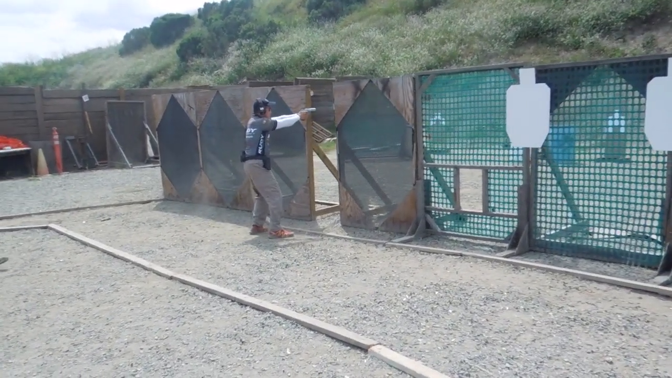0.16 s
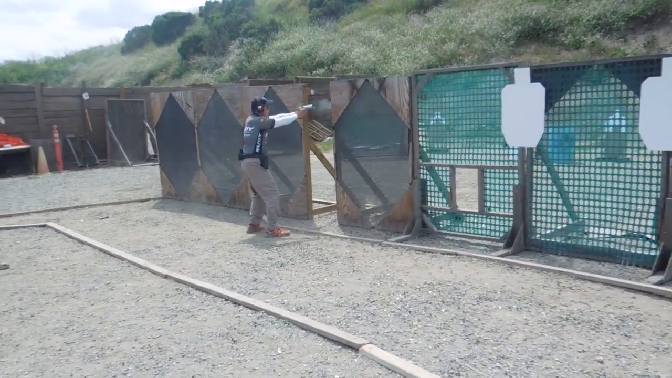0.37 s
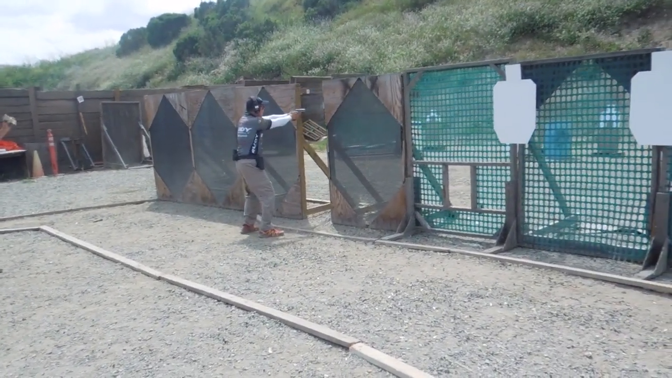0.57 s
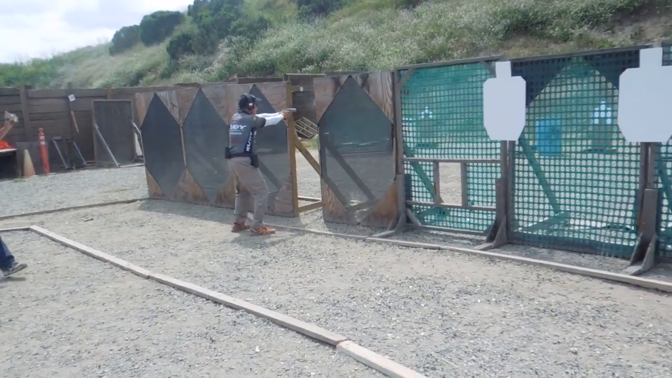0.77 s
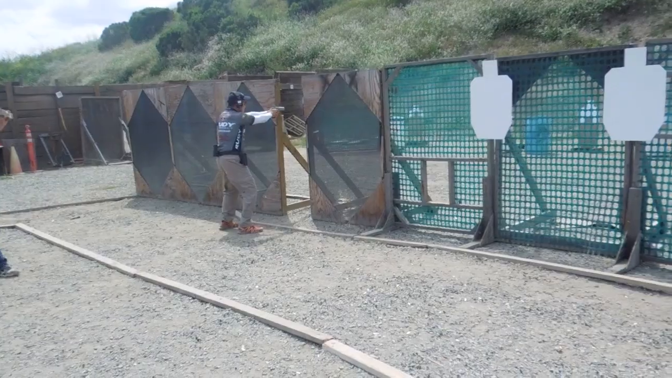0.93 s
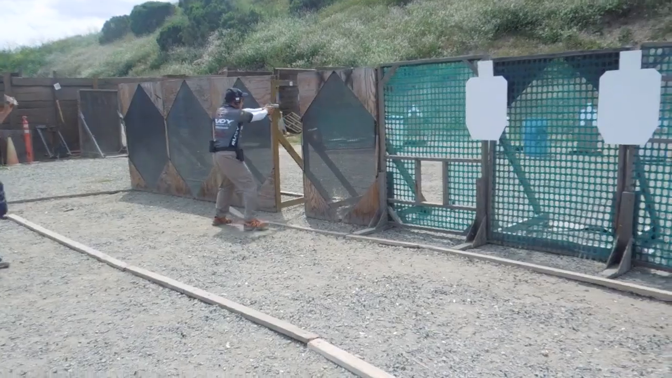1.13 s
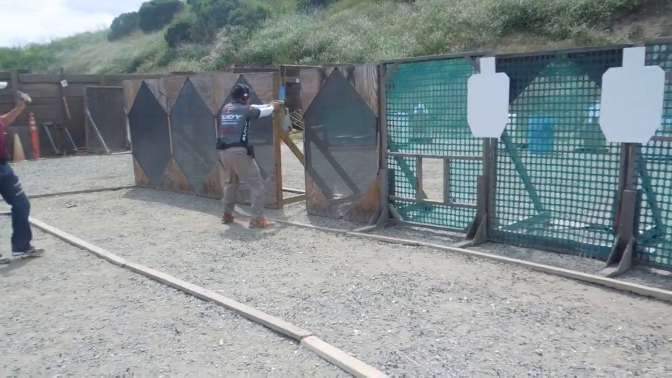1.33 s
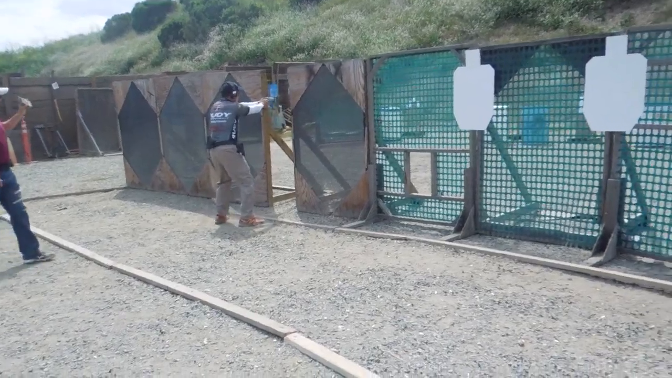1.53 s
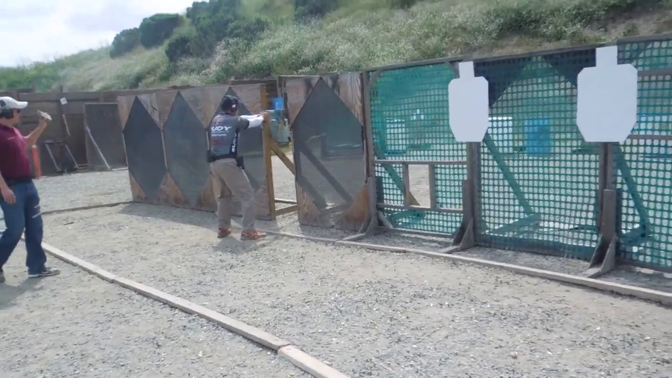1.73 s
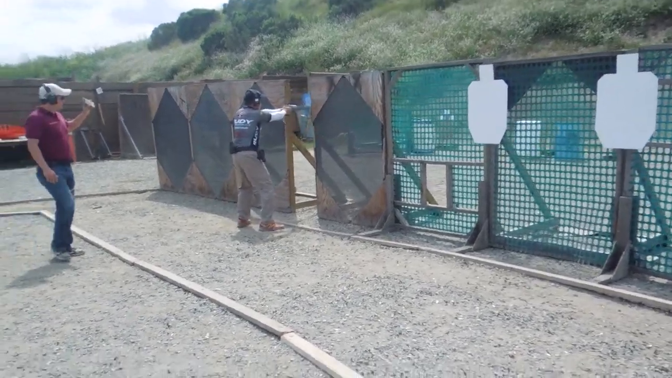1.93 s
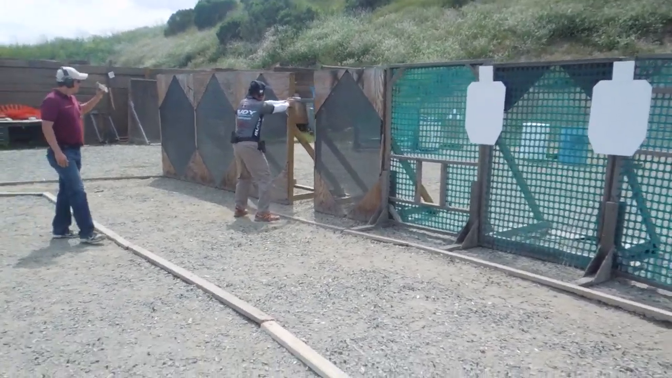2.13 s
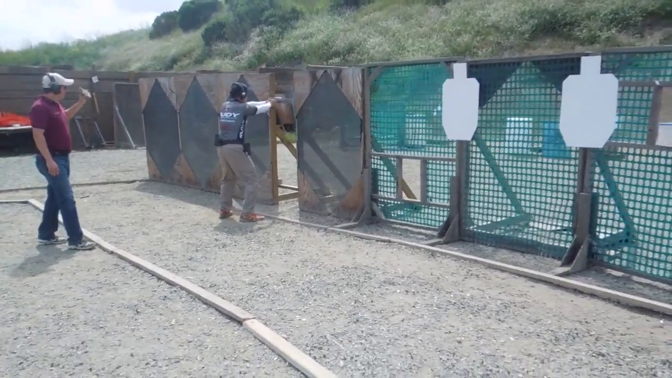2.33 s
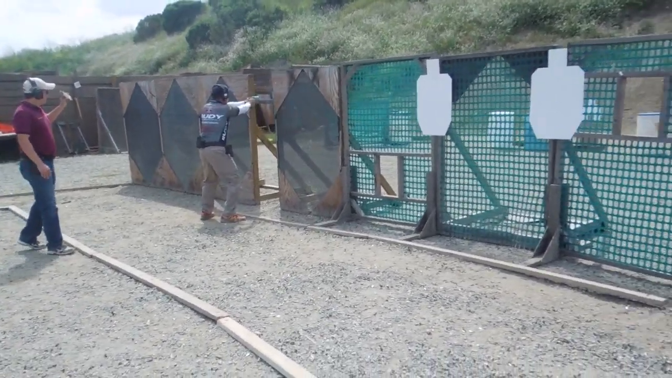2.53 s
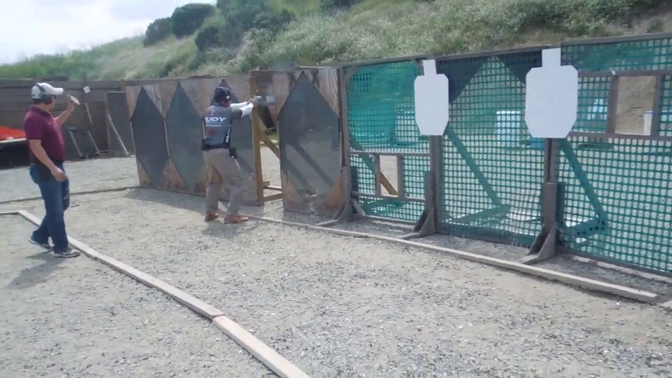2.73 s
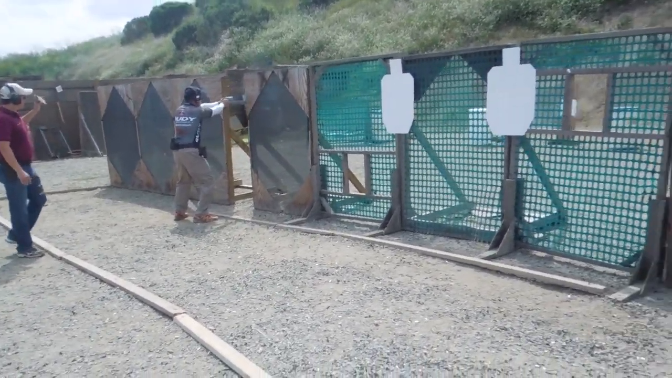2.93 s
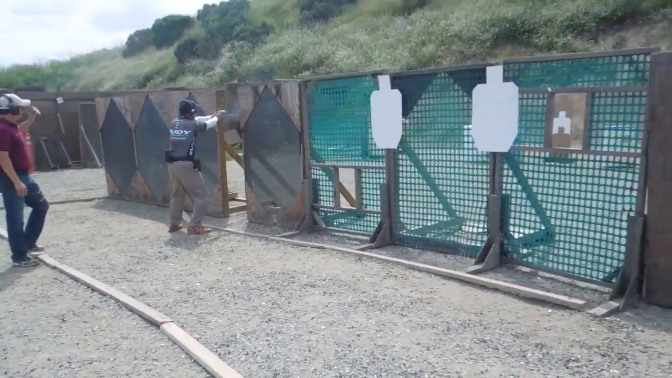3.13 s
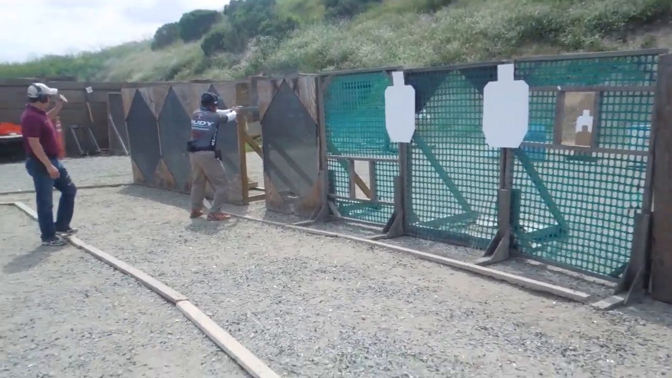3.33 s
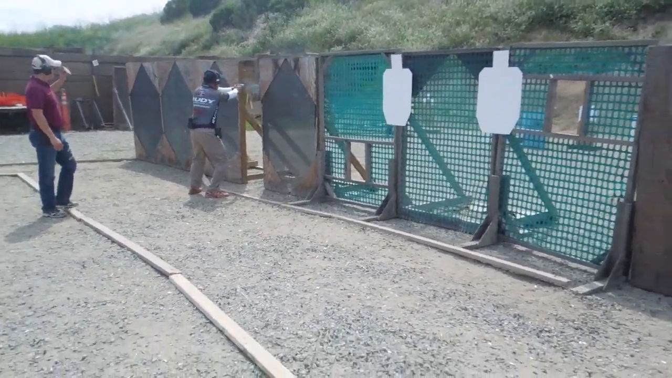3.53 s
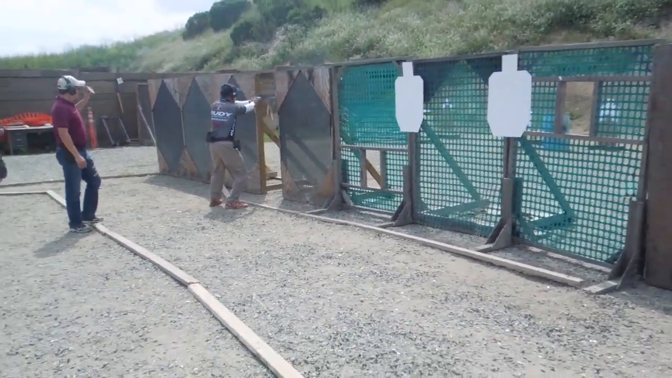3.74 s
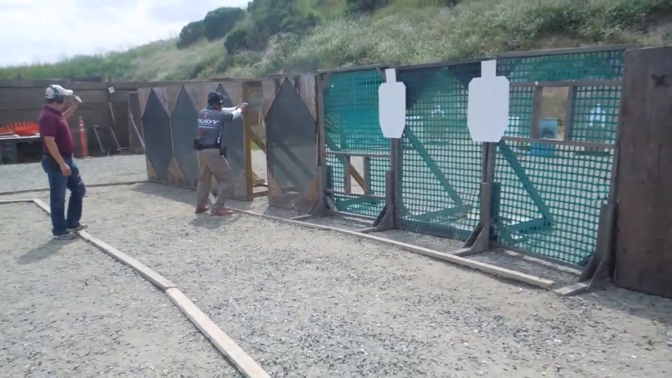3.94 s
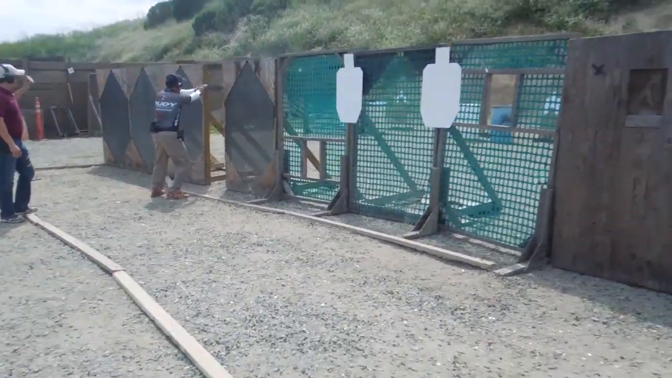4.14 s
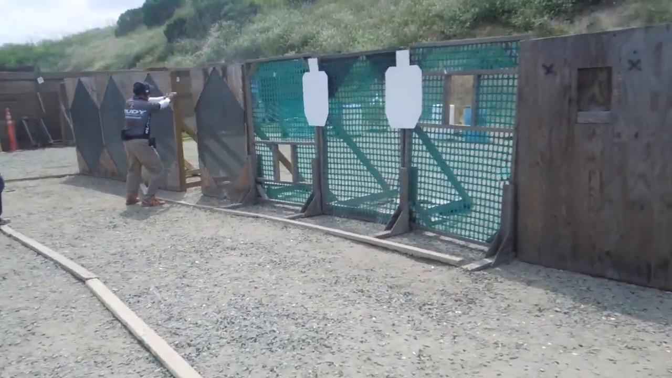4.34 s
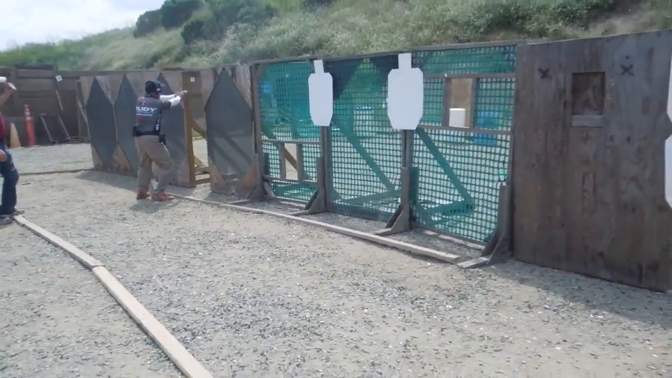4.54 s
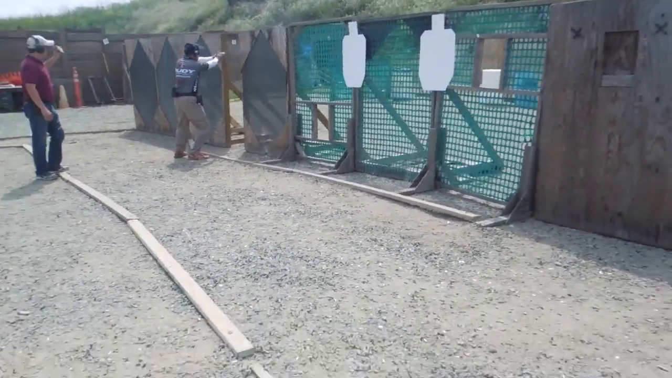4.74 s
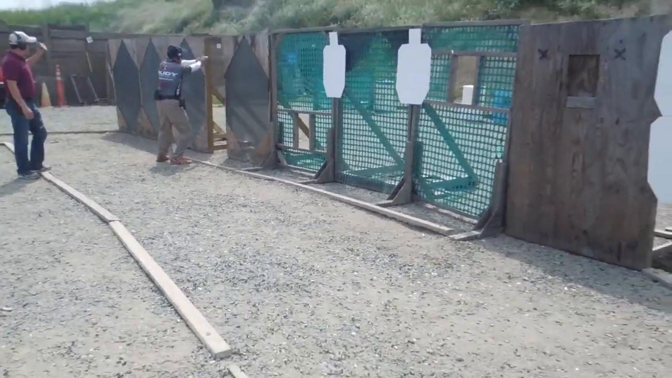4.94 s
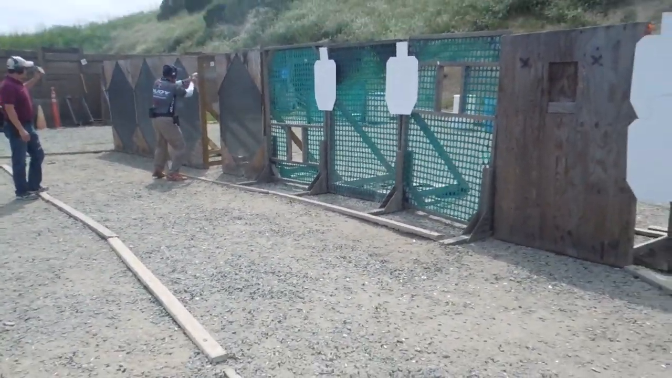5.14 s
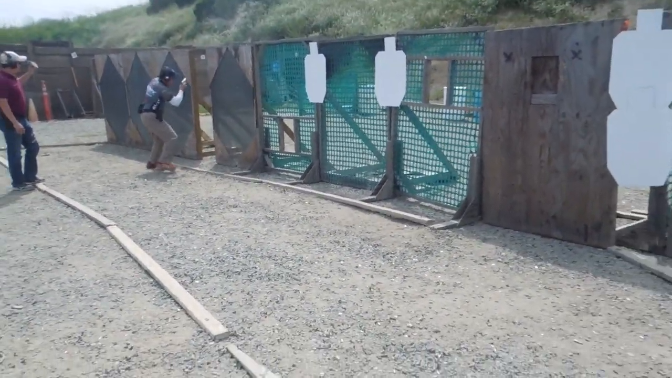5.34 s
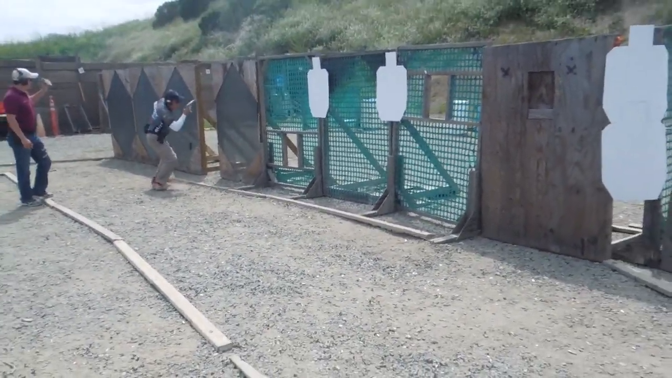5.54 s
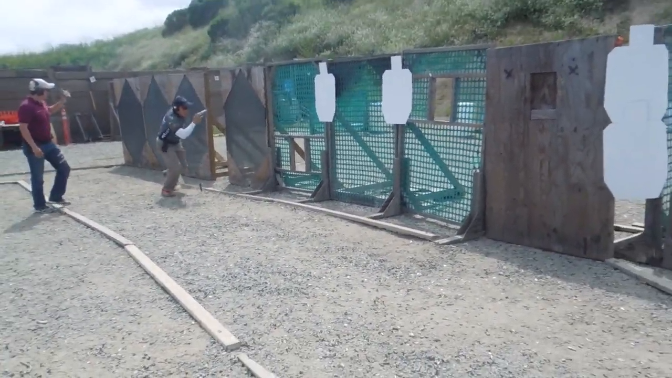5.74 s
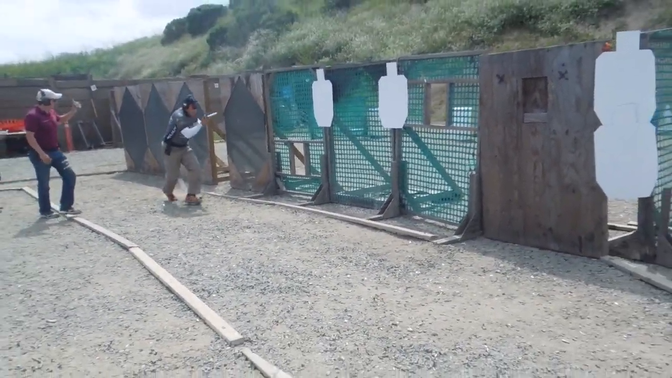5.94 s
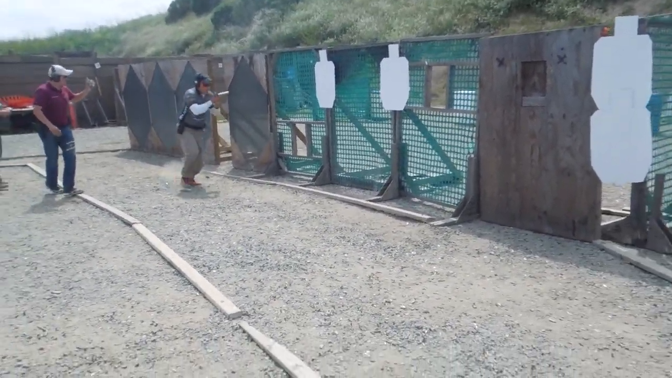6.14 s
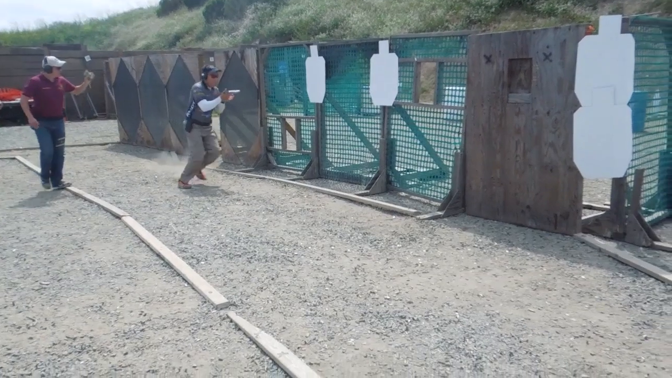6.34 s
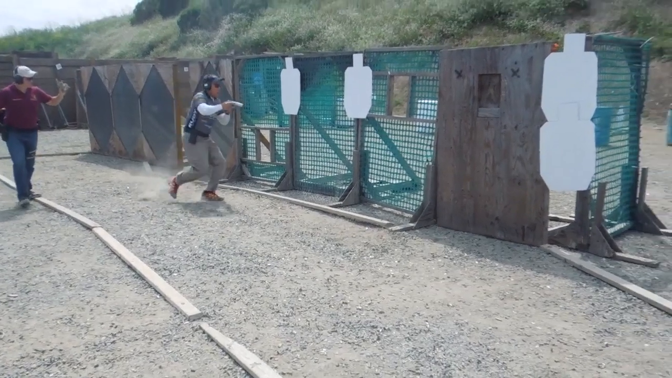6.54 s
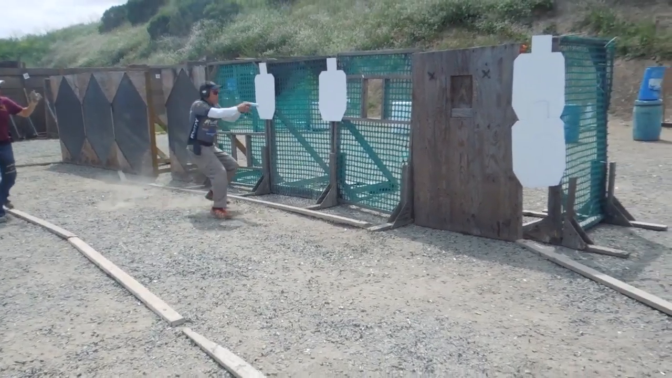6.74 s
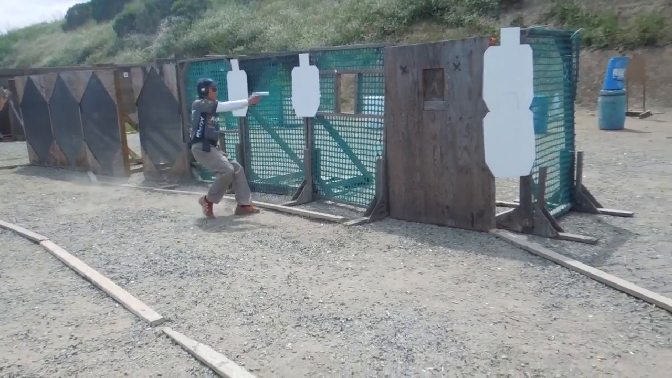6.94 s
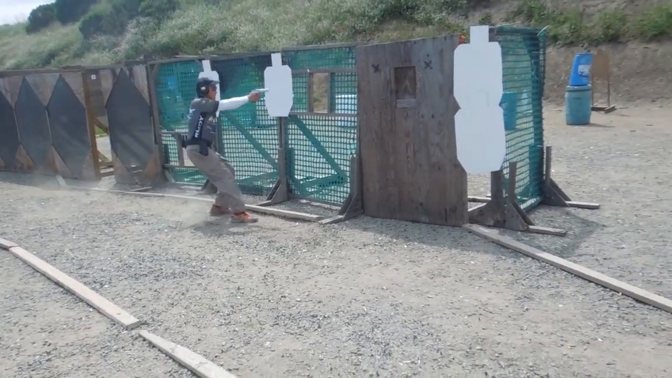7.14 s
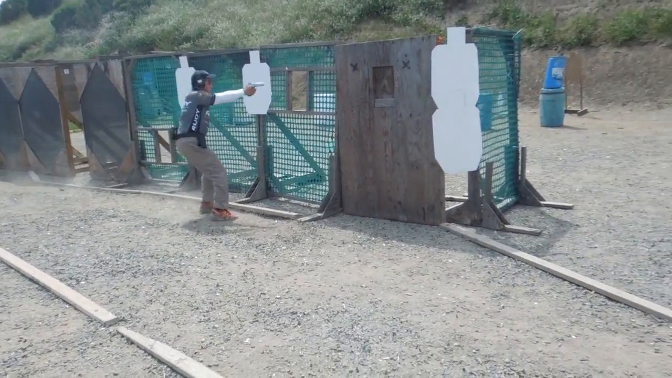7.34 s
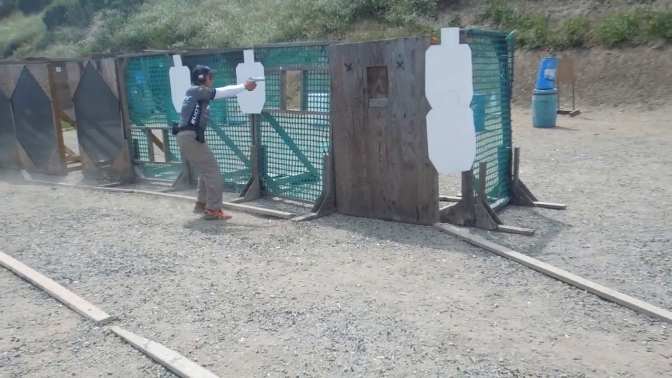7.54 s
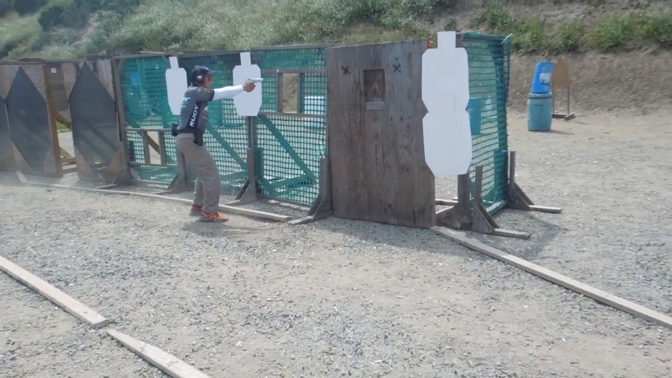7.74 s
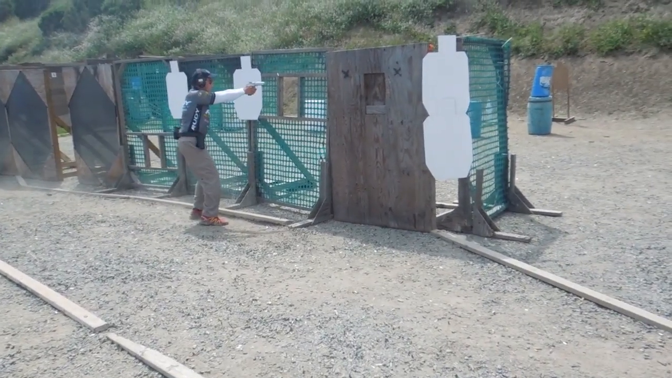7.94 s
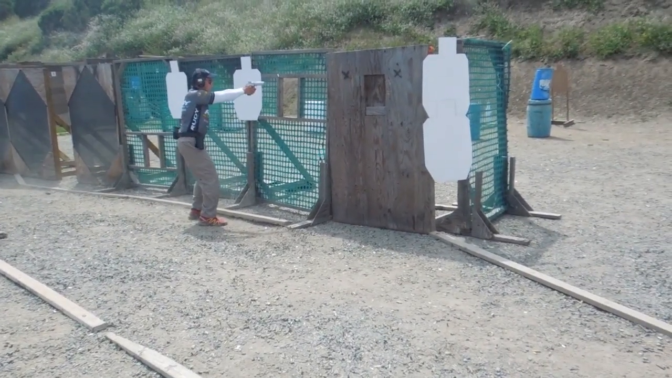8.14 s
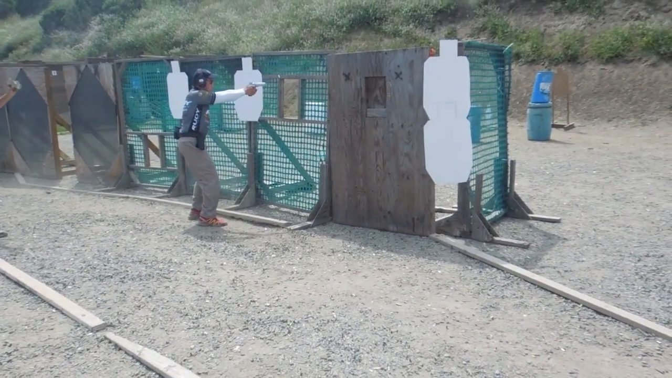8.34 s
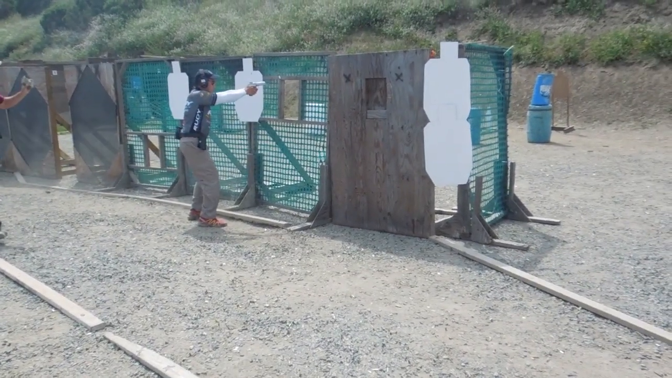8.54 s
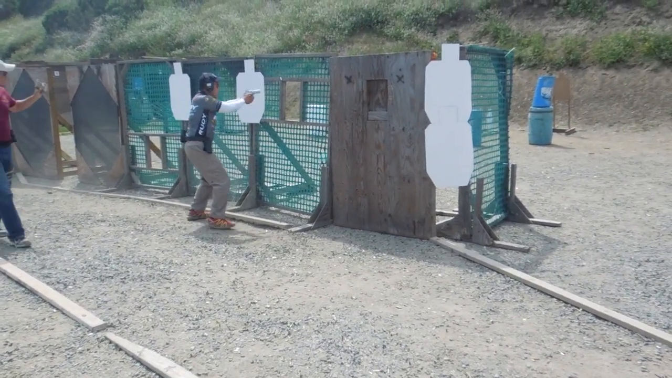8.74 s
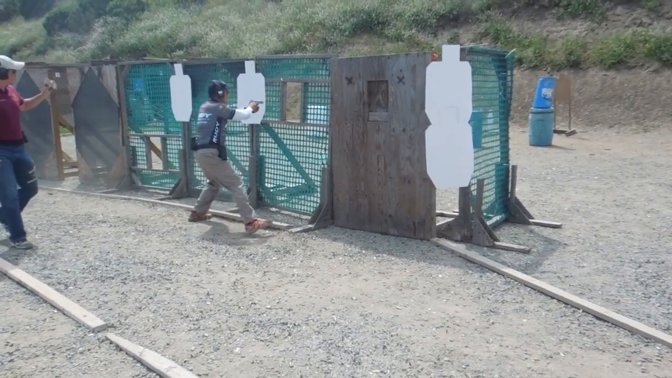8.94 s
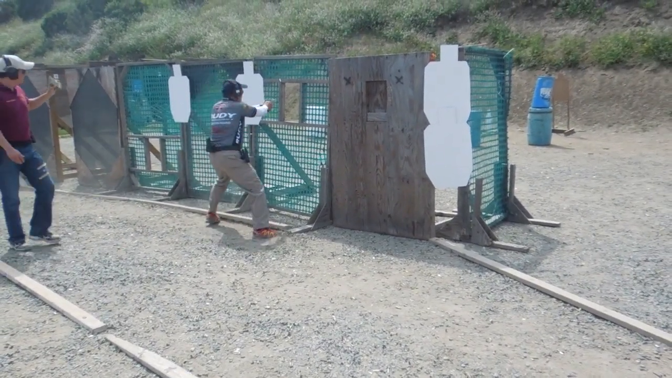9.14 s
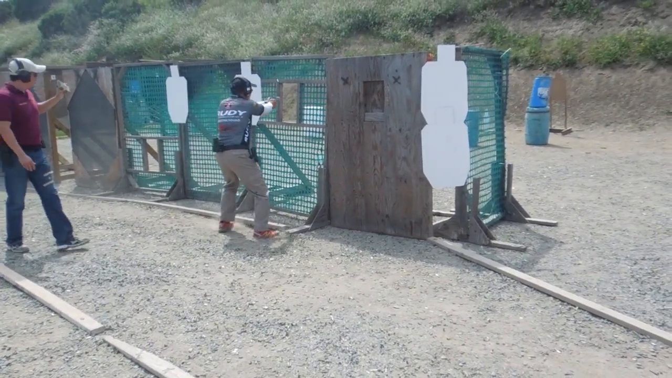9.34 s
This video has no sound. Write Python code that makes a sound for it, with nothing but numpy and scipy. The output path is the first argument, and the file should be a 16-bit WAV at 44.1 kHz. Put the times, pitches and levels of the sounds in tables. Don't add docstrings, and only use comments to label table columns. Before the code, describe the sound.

Loud, clipped pistol shots crack and slap back off walls outdoors, then boots crunch gravel and brass cases tinkle before two more shots.

```python
import sys
import numpy as np
from scipy import signal
from scipy.fft import rfft, irfft, next_fast_len
from scipy.io import wavfile
from scipy.ndimage import uniform_filter1d, map_coordinates

SR = 44100
rng = np.random.default_rng(int(sys.argv[2]) if len(sys.argv) > 2 else 0)


def waveform_to_disk(signal):
    frames = np.transpose(np.atleast_2d(signal))
    scaled = np.clip(frames, -1, 1) * 32767
    samples = np.round(scaled).astype(np.int16)
    wavfile.write(sys.argv[1], SR, samples)


def boost(x):
    u = np.asarray(x, float) / 20
    return 10 ** u


N = 414099


def along(points, hz):
    f, v = np.transpose(points)
    return np.interp(np.log(hz + 1), np.log(f + 1), v)


def unit(x):
    return x / np.sqrt(np.mean(x ** 2) + 1e-20)


def wobble(rate, size=N):
    coarse = np.arange(0, size + 16, 16)
    knots = rng.standard_normal(int(size * rate / SR) + 4)
    return np.interp(np.arange(size), coarse, map_coordinates(knots, [coarse * rate / SR], order=2))


def strength(rows):
    return boost(np.interp(np.arange(N) / SR, *np.transpose(rows)))


# frequency in Hz, left-right likeness from 0 to 1.
AROUND = [(60, .6), (130, 0.2), (290, .9), (630, 0.98), (1400, 1), (3000, .94), (6500, .5), (14000, .3)]
# frequency in Hz, left-right likeness from 0 to 1.
ONE_SPOT = [(100, .95), (600, .99), (3000, .97), (6500, .82), (14000, .55)]


def stereo(pair, spectrum, alike):
    size = pair.shape[1]
    m = next_fast_len(size + 4096)
    hz = np.fft.rfftfreq(m, 1 / SR)
    turn = np.arccos(np.clip(along(alike, hz), -1, 1)) / 2
    coloured = rfft(pair, m) * boost(along(spectrum, hz)) * [np.cos(turn), np.sin(turn)]
    mid, side = irfft(coloured, m)[:, :size]
    return unit(np.array([mid + side, mid - side]))


def noise(size, spectrum, alike):
    return stereo(rng.standard_normal((2, size)), spectrum, alike)


def pan(left_right_db):
    return boost([[left_right_db / 2], [-left_right_db / 2]])


def add(track, s, sound):
    i = round((s + 1) * SR)
    track[:, i:i + sound.shape[-1]] += sound


def spare_gain_db(spare_db, t):
    slide_s = .19 + .002 * spare_db
    return spare_db * np.clip(1 - t / slide_s, 0, 1)


# start in seconds, blast in dB, tail in dB, spare gain in dB, capsule sag from 0 to 3.
SHOTS = [(-.3, 0, -10.5, 5, .01), (.096, 2, -10, 21, .42), (0.5126, 9, -21, 15, .4),
         (1.9087, 12, -18, 18, .01), (2.3966, 11, -23, 9.5, .42), (2.8462, 5.5, -26, 7.5, .45),
         (3.199, 4.5, -27, 3, .25), (3.6405, 5.5, -27.5, 5, .25), (3.9788, 0.2, -32, 1.5, .2),
         (4.735, 8.5, -27.5, 3, .06), (5.131, 0.5, -32, 3.5, .04), (8.138, 5, -12.5, 24, .01),
         (8.65, 14, -21.5, 14.5, 0.035)]
# pitch of the gap over its mean, sag left over right in dB.
AIM = [(1, 0), (.9, 0), (.78, 0), (.9, 0), (.91, 1), (.78, .5), (.89, 2), (.93, 4), (.93, 2), (1.02, -3),
       (.99, -5), (.9, 0), (.9, 0)]
# frequency in Hz, width in Hz, level in dB.
MUZZLE = [(790, 230, -0.5), (1620, 150, -3.5), (2200, 450, -6), (3100, 390, -6), (5900, 1600, -14.5),
          (11500, 3000, -6.5)]
# frequency in Hz, level in dB per Hz.
TAIL_COLOUR = [(59, -35), (100, -11), (222, -2.5), (399, -3.5), (700, -2), (1770, -8.5), (2270, -5.5),
               (3760, -11), (5040, -13), (7350, -12.5), (9460, -12.5), (10700, -7.5), (13500, -12),
               (15000, -32)]
# frequency in Hz, time to fall 60 dB in seconds.
BAY_T60 = [(60, 1.3), (280, 1.08), (600, 0.56), (1000, 0.54), (1600, 0.8), (3400, 0.83), (4300, 0.7),
           (6000, 0.77), (12000, 0.53)]


def muzzle_colour(modes):
    hz = np.geomspace(50, 16000, 200)
    power = sum(boost(2 * db) / (1 + (2 * (hz - c) / width) ** 2) for c, width, db in modes)
    return np.transpose([hz, 10 * np.log10(power / (1 + (250 / hz) ** 4))])


def bay_tail(t):
    hz, frames, z = signal.stft(noise(SR, TAIL_COLOUR, AROUND), SR, nperseg=256)
    patches = uniform_filter1d(rng.standard_normal(z.shape[1:]), size=5, axis=0)
    patches = uniform_filter1d(patches, size=3, axis=1)
    decay_db = -60 * frames / along(BAY_T60, hz)[:, None]
    tail = signal.istft(z * boost(2.4 * unit(patches) + decay_db), SR, nperseg=256)[1][:, :SR]
    lumps = boost(0.51 * wobble(160, size=SR))
    return tail * lumps * (1 - np.exp(-t / .004))


def capsule_sag(t, spare_db):
    dip = -1.3 * (t / 0.0043) * np.exp(1 - t / 0.0044)
    rebound_s = .182 - .0033 * spare_db
    swing = 0.55 * (1 - np.exp(-t / 0.039)) * np.exp(-t / 0.14)
    swing *= np.cos(np.pi / 2 * (t / rebound_s) ** .62)
    return dip + swing * np.cos(np.pi * t / 2) ** 2


def shots():
    track, t = np.zeros((2, N + 3 * SR)), np.arange(SR) / SR
    near_size = SR // 10
    for (s, blast_db, tail_db, spare_db, sag), (pitch, pan_db) in zip(SHOTS, AIM):
        modes = [(c * pitch if c < 2000 else c, width, db) for c, width, db in MUZZLE]
        pop = sum(boost(db - 60 * t / .016) * np.sin(2 * np.pi * c * t) for c, _, db in modes[:4])
        pop *= 1 - np.exp(-(t / .0008) ** 2)
        tail = bay_tail(t)
        near = np.pad(noise(near_size, muzzle_colour(modes), ONE_SPOT), ((0, 0), (0, SR - near_size)))
        burst = boost(blast_db - 4 - 60 * (t / 0.0058) ** 4)
        shelf = boost(blast_db - 23.5 - 10 * (t / 0.023) ** 2)
        blast = near * (burst + shelf) + boost(blast_db - .8) * pop
        sagging = sag * capsule_sag(t, spare_db) * pan(pan_db)
        gain = boost(spare_gain_db(spare_db, t))
        add(track, s, (blast + boost(tail_db) * tail + sagging) * gain)
    return track[:, SR:SR + N]


# heard from in seconds, until in seconds,
# delay then in seconds, delay at the end in seconds, level over the tail in dB.
WALLS = [(.3, 1, .0602, .0602, 18), (0, .3, .0602, .0602, 23), (1, 5.5, .0602, .0602, 21),
         (0, 2.5, .1262, .1213, 11), (2.5, 5.5, .1215, .109, 10.5), (0, 1, .155, .155, 13),
         (1, 2.2, .155, .155, 2), (2.2, 5.5, .1572, .1586, 3), (0, .3, .041, .041, 15),
         (4.5, 5.5, .0496, .047, 15), (8, 9, .044, .037, 19), (8, 9, .085, .081, 12),
         (8.5, 9, .128, .128, -1), (8, 9, .155, .1545, 9)]


def returns():
    for shot_s, _, tail_db, spare_db, _ in SHOTS:
        for start, end, first, last, db in WALLS:
            if not start <= shot_s < end:
                continue
            for crossings in range(2):
                path = np.interp(shot_s, (start, end), (first, last)) + crossings * .161
                loss_db = crossings * (-28 + .36 * spare_db)
                follow_db = .75 * (tail_db + 25 + spare_gain_db(spare_db, path)) - 25
                yield shot_s + path, db + loss_db + follow_db, path


def slaps():
    track, lead_s = np.zeros((2, N + 2 * SR)), .008
    t = np.arange(SR // 25) / SR - lead_s
    u = np.maximum(t, 0)
    slap_shape = (1 - np.exp(-(u / 0.00038) ** 2)) * (boost(-60 * u / 0.005) + boost(-5 - 60 * u / 0.016))
    shape = slap_shape + boost(-18.5 - 20 * (t / 0.018) ** 2)
    for s, db, path in returns():
        bright_db = -10 - 62 * path
        colour = [(200, -24), (900, -13), (1700, -5), (3200, -8), (4500, 1.2 * bright_db - 3.5),
                  (13000, 0.72 * bright_db - 4.5), (16000, -64.5)]
        scatter = noise(len(t), colour, ONE_SPOT)
        ping = 1.6 * boost(-60 * u / .006) * np.sin(2 * np.pi * rng.uniform(1200, 2700) * u)
        slap = shape * (scatter + ping)
        add(track, s - lead_s, boost(db + 2.1) * slap / np.abs(slap).max())
    return track[:, SR:SR + N]


def band_bursts(events, alike, narrow):
    track, t = np.zeros((2, N + 2 * SR)), np.arange(SR // 8) / SR
    band = ((.58, -30), (.88, -6), (1, 0), (1.14, -6), (1.8, -26))  # (times the pitch, dB)
    for s, db, hz, t60 in events:
        colour = [(hz * k, narrow * d) for k, d in band] + [(4 * hz, -45)]
        shape = boost(-60 * t / t60) * (1 - np.exp(-30 * t / t60))
        add(track, s, boost(db - 2) * shape * noise(len(t), colour, alike))
    return track[:, SR:SR + N]


# start in seconds,
# peak in dB, pitch in Hz, time to fall 60 dB in seconds.
THUDS = [(0, -12, 1060, .012), (0.0276, -14, 1122, 0.0096), (6.621, -25, 766, 0.033),
         (6.625, -28, 140, .08), (6.905, -26.5, 570, .06), (7.078, -26, 580, 0.081),
         (7.308, -22, 600, 0.097), (7.314, -19, 1270, 0.055), (7.443, -25.5, 1240, .07),
         (7.468, -18.5, 605, 0.23), (9.264, -41.5, 620, 0.079), (4.736, -12, 130, .07),
         (8.165, -1, 750, .25), (8.65, -12, 75, .2), (8.687, -6, 850, .08), (6.62, -30, 230, .08),
         (6.25, -48, 1300, .3), (5.9, -52, 1250, .2)]


def hollow_thuds():
    return band_bursts(THUDS, AROUND, narrow=1.0)


# start in seconds, peak in dB, pitch in Hz.
BRASS = [(1.3478, -25, 11530), (1.5176, -16, 11500), (1.5325, -36, 11500), (1.7853, -32, 11500),
         (2.7152, -34, 11100), (5.6122, -54, 11100), (5.69, -51, 10770), (5.896, -44.5, 10400),
         (6.2805, -43, 10900), (6.3894, -35, 11100), (6.4647, -35, 11600), (6.5181, -25, 10700),
         (6.7226, -32, 11200), (6.8299, -14, 11970), (6.869, -21, 10900), (6.9285, -27, 11000),
         (6.96, -20, 11560), (6.9955, -14.5, 11910), (7.1123, -26, 10930), (7.1739, -18, 11200),
         (7.1838, -17, 10130), (7.2414, -14, 11620), (7.2543, -12, 8340), (7.2694, -22, 12000),
         (7.3494, -28, 10770), (7.3844, -15, 11660), (7.4294, -30, 11500)]
# start in seconds, peak in dB, pitch in Hz,
# time to fall 60 dB in seconds.
BRASS_OWN_T60 = [(.03, -38, 12200, .08), (.03, -40, 11300, .06), (.08, -30, 7700, .11),
                 (.93, -56, 10700, .15), (1.065, -54, 10700, .15), (1.18, -52, 9600, .06),
                 (1.233, -54, 11100, .15), (1.56, -47, 10200, .15), (1.81, -50, 7700, .2),
                 (1.81, -44, 11300, .2), (1.86, -42, 10800, .1), (1.88, -35, 11300, .2),
                 (2.716, -49, 7850, .33), (4.6, -71, 830, .6), (5.51, -56, 11100, .05),
                 (5.54, -58, 11900, .05), (5.56, -56, 11400, .1), (5.57, -56, 10500, .05),
                 (5.612, -58, 7500, .08), (5.64, -55, 7200, .3), (5.645, -53, 10500, .2),
                 (5.645, -57, 11500, .15), (5.97, -55, 11100, .05), (6.0, -56, 7900, .15),
                 (6.32, -48, 9300, .05), (6.335, -48, 11900, .06), (6.6159, -23, 11500, .03),
                 (6.68, -43, 11050, .3), (6.7, -40, 11900, .4), (6.77, -39, 11050, .3),
                 (6.77, -37, 11900, .3), (6.835, -22, 7600, .04), (6.84, -20, 8600, .04),
                 (7.27, -24, 7700, .1), (7.325, -33, 8500, .1), (7.33, -30, 10800, .15),
                 (7.64, -40, 8100, .2), (7.7558, -27, 10200, .04), (7.76, -32, 8400, .06),
                 (7.925, -42, 8800, .08), (8.0282, -26, 7950, .035)]


def brass():
    track, t = np.zeros((2, N + 2 * SR)), np.arange(SR // 4) / SR
    modes = ((1, 1), (.4, 1.004), (.04, .953))
    for s, db, hz, t60 in [(*row, .085) for row in BRASS] + BRASS_OWN_T60:
        phases = 2 * np.pi * rng.random((3, 2, 1))
        tone = sum(g * np.sin(2 * np.pi * hz * k * t + p) for (g, k), p in zip(modes, phases))
        tumble_db = np.interp(t, np.linspace(0, t[-1], 30), rng.normal(0, 2.8, size=30))
        t60 = max(t60, .01)
        ring = boost(-60 * t / t60) + boost(-11 - 60 * t / (4.5 * t60))
        ring *= (1 - np.exp(-t / .0007)) * np.cos(2 * np.pi * t)
        add(track, s, boost(db - 8.5 + tumble_db) * ring * tone * pan(1.6))
    return track[:, SR:SR + N]


def dry_contacts(events, crack_s, drag_s, drag_db, spike_db):
    track, t = np.zeros((2, N + 2 * SR)), np.arange(SR // 25) / SR
    spike = boost(spike_db - 60 * t / .0015)
    drag = boost(drag_db - 28 * (t / drag_s) ** 2) * (1 - np.exp(-t / .002))
    shape = boost(-2.5 - 60 * t / crack_s) + drag
    for s, db, body_db, pan_db in events:
        colour = [(300, body_db - 22.5), (1200, body_db + 12), (3000, body_db + 8),
                  (5000, -11), (11000, -1.5), (16000, -5)]
        click = noise(len(t), colour, ONE_SPOT) * (shape + spike * (body_db < 0))
        add(track, s, boost(db - 6 + max(body_db, 0)) * click * pan(pan_db))
    return track[:, SR:SR + N]


# start in seconds, peak in
# dB, body in dB, left over right in dB.
TICKS = [(1.2494, -48.5, 8, 3.5), (1.3974, -49.5, -1, 0), (1.4254, -50, 1, 1.5), (1.6863, -29, -9, -5.0),
         (1.7344, -40, 17.5, 1), (1.7452, -41, -10, 2.5), (5.6394, -44, -5, 3.5), (5.896, -32, -13, -1),
         (6.2437, -38, -15, 2), (6.4655, -33, -17, 1.5), (6.6274, -19, -26, 0), (6.9967, -22, -14.5, -2.5),
         (7.153, -21, -16, 1.0), (7.2569, -8.5, -26, -1.5), (7.3796, -7, -23, 4), (7.403, -9, -14, -0.5),
         (7.5489, -7, -21.5, 0.5), (7.557, -17.5, -16, -0.5), (7.5797, -24, -20, 0),
         (7.6121, -20.5, -32.5, 0.5), (7.8471, -21.5, -22, 1.5), (7.9613, -23.5, -16, 3),
         (8.0282, -22.5, -14, 1.5), (9.2061, -52, 12, -2),
         (.0285, -30, -14, 0), (.08, -32, -25, 0), (.925, -52, -20, 0), (1.028, -55, 2, 0),
         (1.53, -45, -8, 0), (1.596, -48, -10, 0), (5.612, -48, -20, 0), (5.652, -56, 5, 0),
         (6.4008, -30, -20, 0), (6.557, -38, -10, 0), (6.566, -36, -12, 0), (6.5824, -42, 0, 0),
         (6.7126, -33, -14, .5), (6.8014, -42, 5, -.5), (6.852, -18, -18, 0), (6.9241, -33, -4, 0),
         (6.9486, -30, -6, 0), (7.0314, -34, -8, 0), (7.0538, -31, -6, 0), (7.0763, -30, -6, 0),
         (7.189, -28, -14, 0), (7.3098, -26, -4, 0), (7.335, -28, -10, 0), (7.443, -30, -8, 0),
         (7.665, -34, -18, 0), (7.7069, -36, -4, 0), (7.7303, -27, -12, .5), (7.9214, -35, -12, .5),
         (7.9977, -32, -12, 0), (8.064, -37, -14, 0),
         (1.8947, -35, 20, 0.5),
    (1.8785, -40.5, 11.5, -2),
]
# start in seconds, peak in dB, body in dB, left over right in dB.
SCUFFS = [(1.3471, -35, -31, 1.3), (1.4654, -39, -3, 1.0), (5.8402, -30, -31, 1.52),
          (5.8584, -33, -28, 1.1), (6.1272, -38, -25, 1.0), (6.2971, -35, -28, 0.55),
          (6.3677, -32.5, -10, 0.94), (6.42, -9, -29, 0.81), (6.6179, -19, -18, 1.0),
          (6.8305, -9, -26, 0.92), (7.2308, -16.5, -14.5, 1.2), (7.4974, -22.5, -14.5, 1.0),
          (7.6336, -24, -30.5, 1.0), (7.7159, -23, -19, 1.0), (9.3304, -44.5, -6, 0.98)]


def stones_and_kit():
    short = dry_contacts(TICKS, crack_s=0.009, drag_s=0.0073, drag_db=-13.5, spike_db=2.5)
    return short + dry_contacts(SCUFFS, crack_s=0.021, drag_s=0.024, drag_db=-7, spike_db=-12)


# time of most weight in seconds, crunch in dB, grit over crunch in dB,
# loading in dB per second, settling in dB per second.
STEPS = [(1.27, -63, -17, 25, 30), (1.47, -53, -12, 150, 100), (1.55, -54, -8, 100, 90),
         (1.89, -48, -6, 25, 300), (5.4, -65, -7, 30, 150), (5.66, -70, -9, 400, 40),
         (5.87, -65, -8, 500, 10), (6.13, -54, -1, 400, 180), (6.27, -63, -8, 40, 15),
         (6.42, -52, -2, 150, 110), (6.62, -38, -12, 150, 400), (6.75, -48, -4, 100, 5),
         (6.84, -35, -4, 500, 26), (7.1, -43, -4, 60, 40), (7.26, -35, 0, 250, 55), (7.5, -45, -8, 30, 40),
         (7.74, -35, -5, 200, 80), (7.97, -42.5, -9, 25, 50), (8.4, -33, -11, 60, 130),
         (8.85, -44, -2, 60, 140), (9.244, -55, -10, 200, 200), (9.345, -53, -9, 300, 10)]


def treading():
    power, t = np.zeros((2, N + 3 * SR)), np.arange(-SR // 2, SR // 2) / SR
    bangs = np.array([row[0] for row in SHOTS] + [N / SR])
    for s, db, grit_db, loading, settling in STEPS:
        fall_db = np.where(t < 0, -loading, settling) * t
        shape = boost(2 * (db - fall_db)) * np.cos(np.pi * t) ** 2
        before_bang = s + t < bangs[bangs > s][0]
        add(power, s - .5, shape * before_bang * boost([[0], [2 * grit_db]]))
    return np.sqrt(power[:, SR:SR + N])


def gravel(spectrum, density, spread_db):
    clumps = boost(5 * wobble(60) + 4 * wobble(22))
    hits = rng.random((2, N)) < density * clumps / SR
    size_db = np.minimum(spread_db * rng.exponential(size=(2, N)), 9)
    sizes = boost(size_db) * rng.standard_normal((2, N))
    return stereo(unit(hits * sizes) + .28 * rng.standard_normal((2, N)), spectrum, AROUND)


# frequency in Hz, level in dB per Hz.
CRUNCH = [(200, -25), (400, -7), (600, -1), (880, -6.5), (1250, -4), (1500, -9), (1750, -5.5), (2050, -11),
          (2350, -10), (3500, -17), (6000, -28)]
# frequency in Hz, level in dB per Hz.
GRIT = [(1760, -41.5), (3000, -12.5), (6870, -12.5), (8410, -7.5), (9170, -13.5), (11500, -3),
        (15000, -24.5)]


def footsteps():
    crunch, grit = treading()
    crunching = crunch * boost(1.2) * gravel(CRUNCH, density=2200, spread_db=3.1)
    return crunching + grit * boost(2.8) * gravel(GRIT, density=3500, spread_db=2.5)


def buffeting(spectrum, rate):
    lumps = boost(2.6 * wobble(rate) + 2.2 * np.array([wobble(rate), wobble(rate)]))
    return unit(lumps * noise(N, spectrum, [(20, 0.75), (60, -.25), (200, .05)])) * pan(1.6)


# time in seconds, strength in dB.
HANDLING = [(.95, -70), (1.7, -68), (1.89, -57), (2.1, -85), (5.15, -72), (5.4, -47), (5.6, -49),
            (5.81, -68), (6.0, -48), (6.5, -50), (6.7, -42), (7.2, -37), (7.46, -30), (8.1, -32),
            (8.65, -33), (8.85, -41), (9.39, -39)]
# frequency in Hz, level in dB per Hz.
RUMBLE = [(10, -7.5), (30, -3), (60, -10), (150, -30.5), (400, -71)]


def handling():
    return boost(2.5) * strength(HANDLING) * buffeting(RUMBLE, rate=2)


# time in seconds, strength in dB.
WIND = [(1.4, -73), (1.55, -54), (1.9, -53), (2.05, -85), (5.4, -67), (5.81, -84), (6.08, -63), (6.45, -61),
        (6.82, -45), (7.02, -47), (7.2, -31), (7.46, -22), (7.632, -44), (7.648, -20), (8.088, -23),
        (8.104, -38), (8.5, -36), (9.39, -48)]
# frequency in Hz, level in dB per Hz.
GUST = [(35, -29.5), (60, -1), (124, 1), (265, -5), (450, -17), (800, -44), (1170, -58.5), (1980, -120)]
# start in seconds, peak in dB, pitch in Hz,
# time to fall 60 dB in seconds.
PUFFS = [(7.643, -17, 300, .05), (7.665, -16, 120, .08), (7.71, -15, 330, .05), (7.765, -15, 220, .06),
         (7.795, -21, 450, .05), (7.832, -19, 420, .04), (7.898, -18, 380, .05), (7.963, -18, 300, .05),
         (8.085, -20, 260, .04), (8.118, -16, 110, .06)]


def wind():
    return strength(WIND) * buffeting(GUST, rate=32) + band_bursts(PUFFS, [(100, .1)], narrow=.3)


# frequency in Hz, level in dB per Hz.
HUSH = [(12, -28.5), (20, -4), (41, -9), (124, -33.5), (357, -26), (4690, -41.5), (11400, -38.5),
        (13100, -36), (15000, -62.5)]


def hush():
    return boost(-64 + 1.5 * wobble(6)) * noise(N, HUSH, AROUND)


def scene():
    bangs = shots() + slaps()
    ground = hollow_thuds() + brass() + stones_and_kit() + footsteps()
    return bangs + ground + handling() + wind() + hush()


def top_cut(x):
    return signal.sosfilt(signal.butter(12, 15260, fs=SR, output="sos"), x)


def record(dry):
    clipped = dry / (1 + np.abs(dry / 0.87) ** 12) ** (1 / 12)
    m = next_fast_len(N + 4096)
    hz = np.fft.rfftfreq(m, 1 / SR)
    kept = boost(-28 / (1 + np.exp((14300 - hz) / 150)))
    mix = irfft(rfft(clipped, m) * kept, m)[:, :N]
    return top_cut(mix)


dry = scene()
out = record(dry)
waveform_to_disk(out)
```